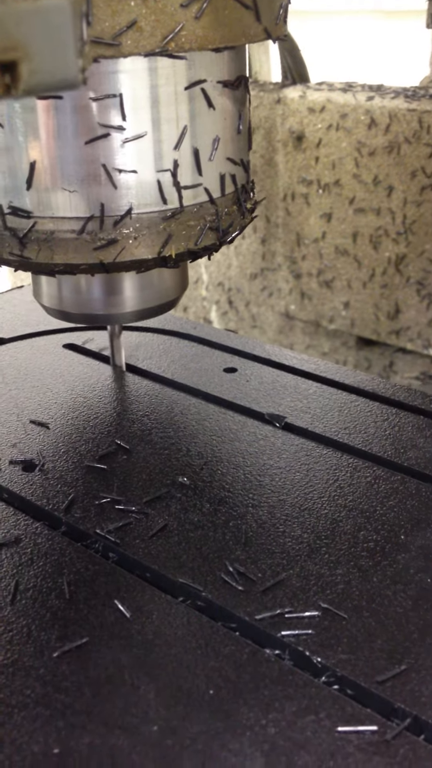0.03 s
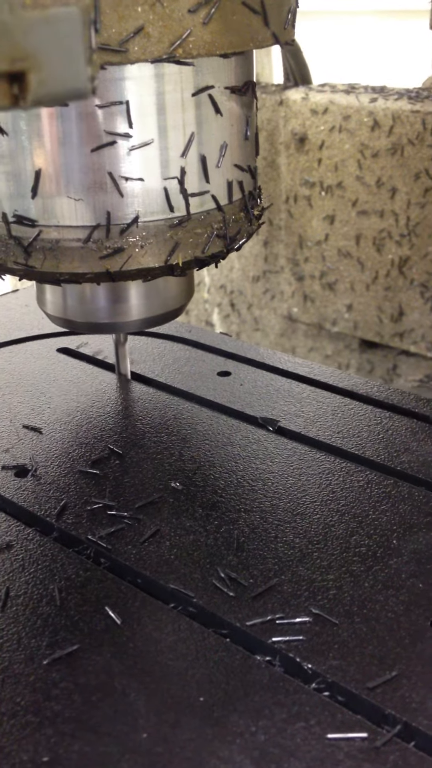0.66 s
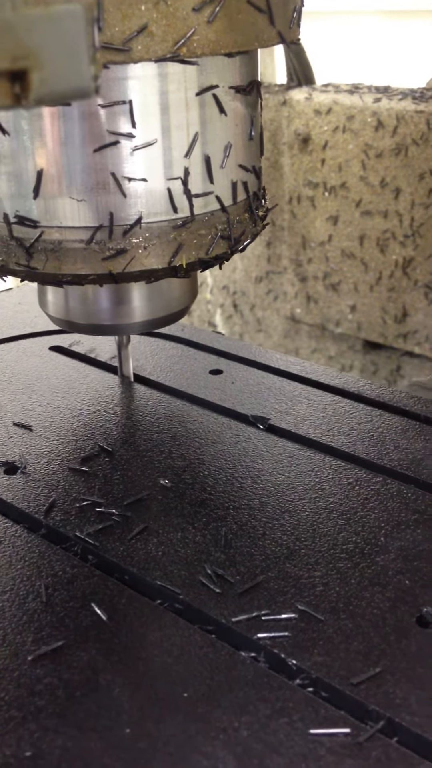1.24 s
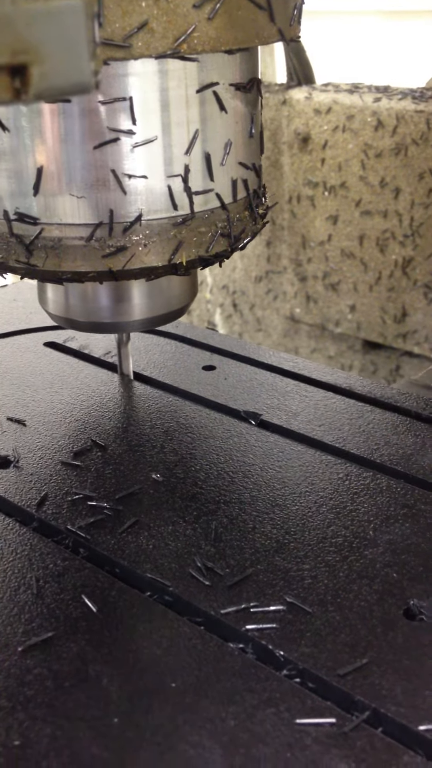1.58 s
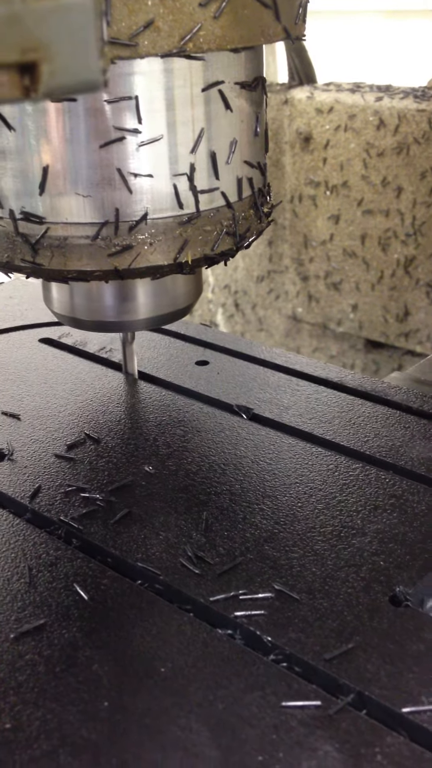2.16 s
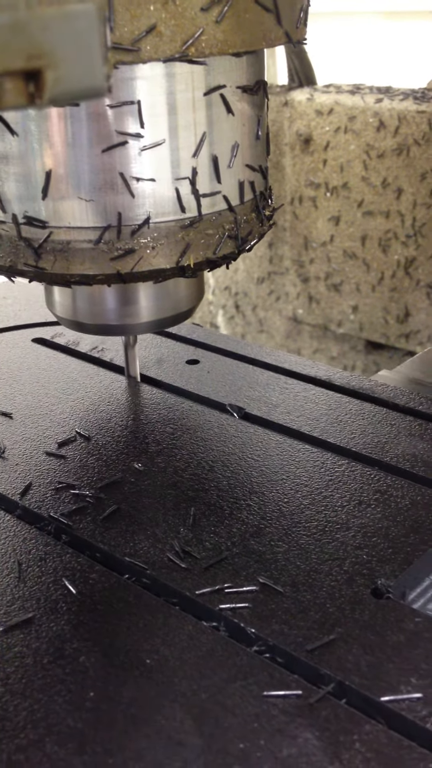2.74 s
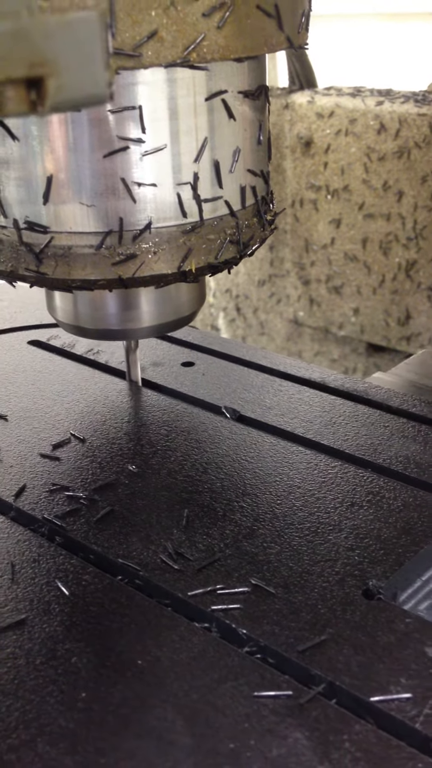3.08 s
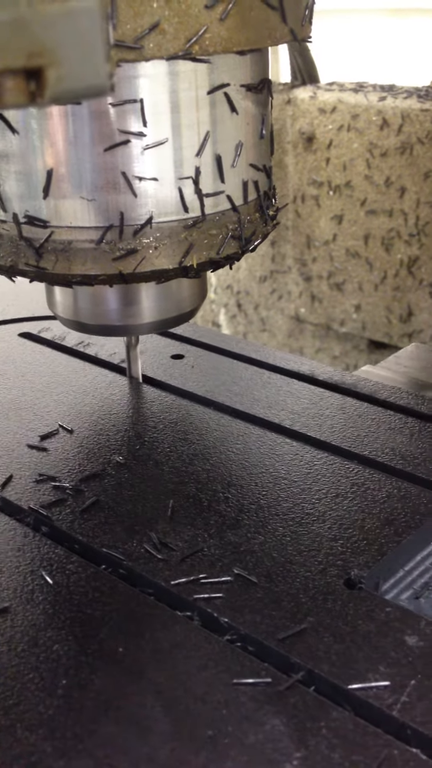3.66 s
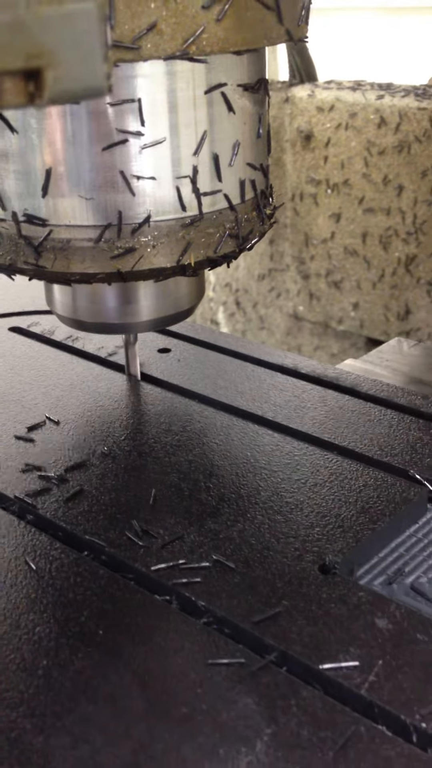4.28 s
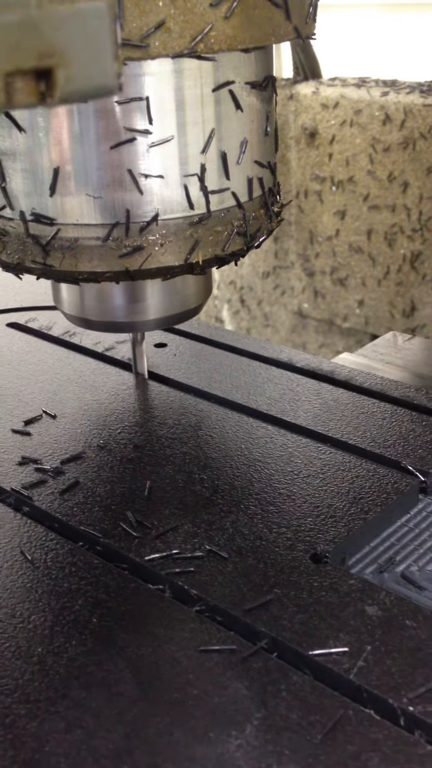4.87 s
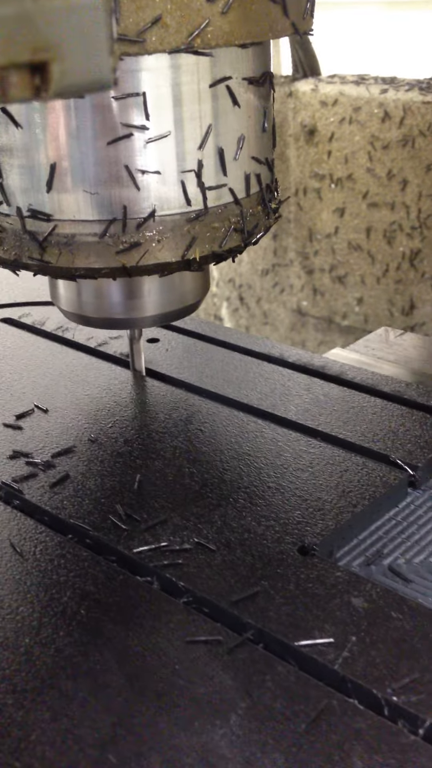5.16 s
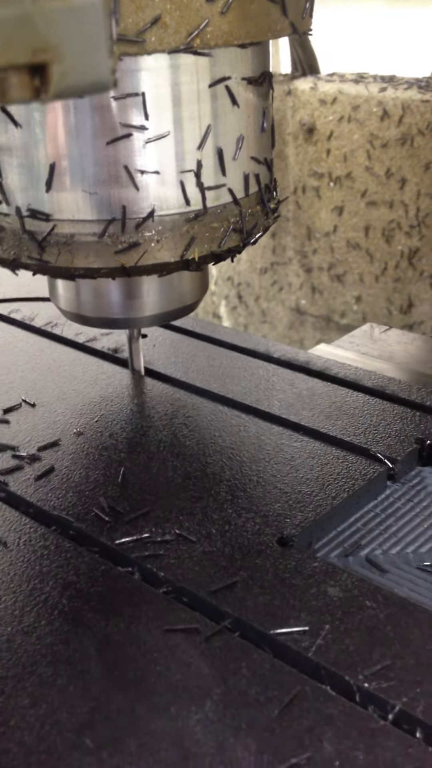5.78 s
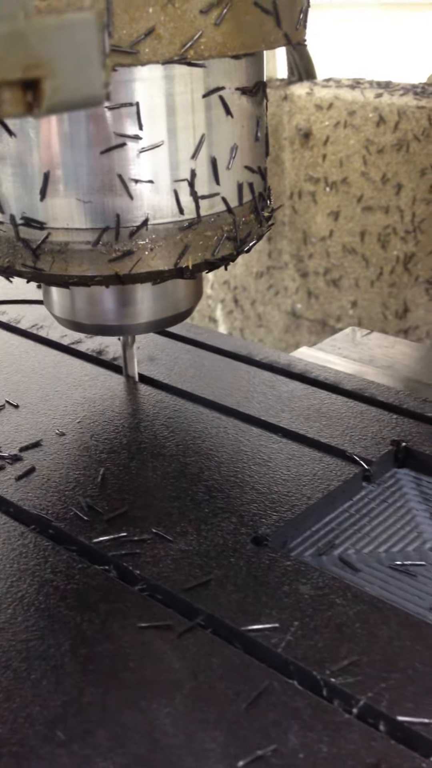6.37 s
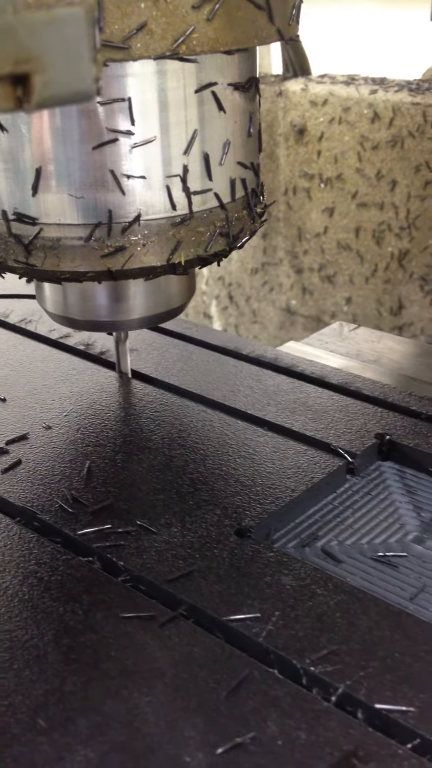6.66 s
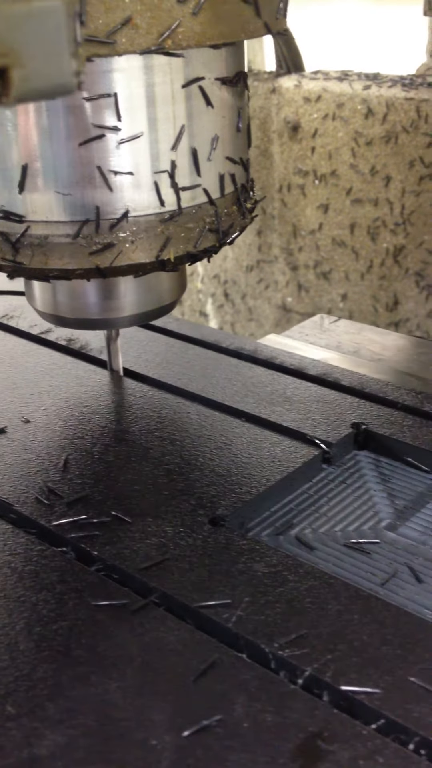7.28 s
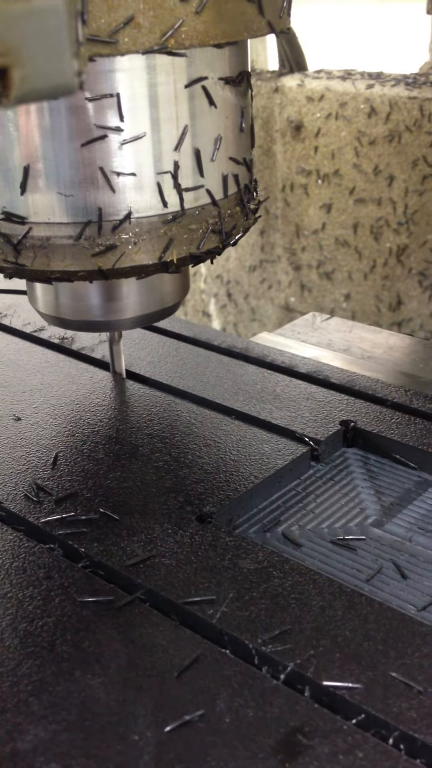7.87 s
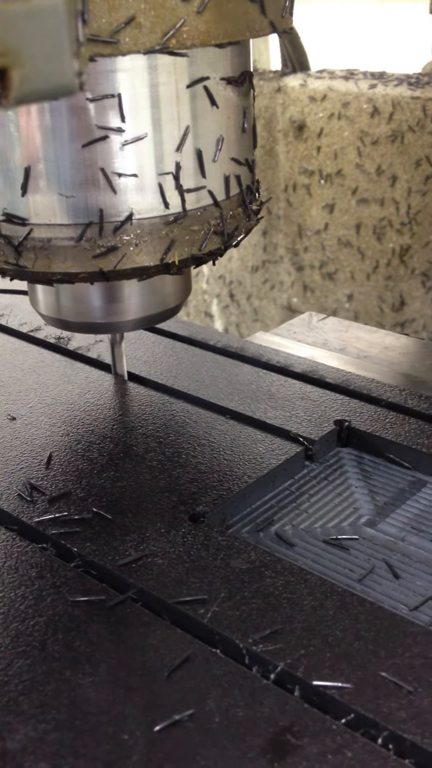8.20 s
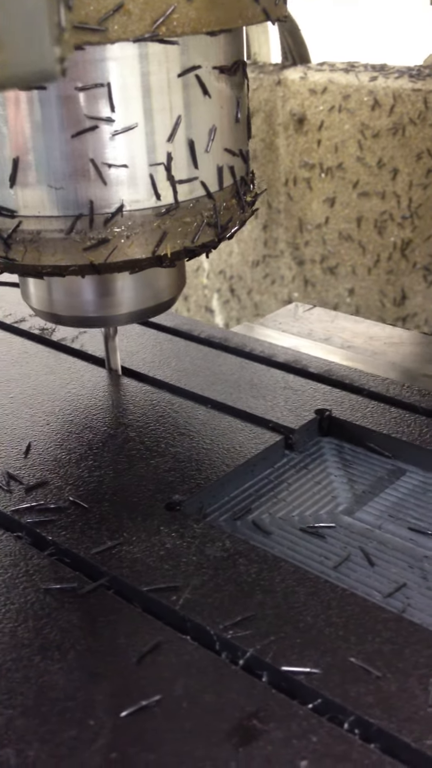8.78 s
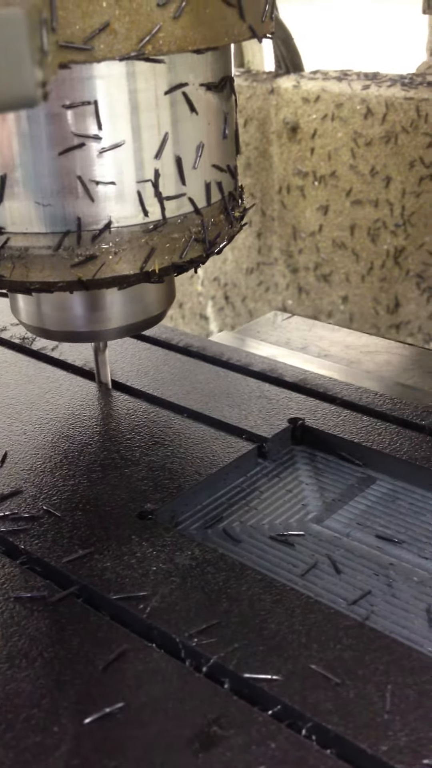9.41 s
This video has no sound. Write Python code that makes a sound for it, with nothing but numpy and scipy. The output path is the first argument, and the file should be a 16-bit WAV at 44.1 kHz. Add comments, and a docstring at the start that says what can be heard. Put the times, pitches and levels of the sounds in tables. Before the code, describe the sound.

Close to a CNC milling machine, a small cutter hisses steadily through metal while air rushes around the spindle. After about a second the cut squeals for a moment, then settles back into a high metallic hiss with a few ringing flares, the squeal returning at the end. A quiet, unchanging spindle whine and the softly surging hum of the feed motors sit in the background.

```python
"""Beside a CNC machine, one microphone close to the small cutter as it travels over the work.
At the back lie a few faint low bumps, the surging hum of the feed motors and the whine of the spindle,
which runs at constant speed. Air rushes round it; the strength of that rush carries the fizz and the
whine with it, the cut only a little, and now and then they sag or flare for an instant. Up front, the
cut hisses through a cluster of metal resonances near 5 kHz and squeals for a moment."""
import sys
import numpy as np
from scipy import signal
from scipy.fft import rfft, irfft, next_fast_len
from scipy.io import wavfile
from scipy.ndimage import uniform_filter1d, minimum_filter1d

SR = 44100
rng = np.random.default_rng(int(sys.argv[2]) if len(sys.argv) > 2 else 0)


def bounce(signal):
    """Save signal as a 16-bit WAV file at the path given by the first command-line argument."""
    frames = np.transpose(np.atleast_2d(signal))
    limited = np.clip(frames, -1, 1)
    pcm = np.round(limited * 32767).astype(np.int16)
    wavfile.write(sys.argv[1], SR, pcm)


N = 416304
TIME = np.arange(N) / SR
FFT_SIZE = 2 * next_fast_len(N // 2 + 1)
BIN_HZ = np.fft.rfftfreq(FFT_SIZE, 1 / SR)


def amp(db):
    """Decibels to gain."""
    return 10 ** (np.asarray(db) / 20)


def follow(rows):
    """Each column of a time curve, at every sample."""
    times, *columns = np.transpose(rows)
    return [np.interp(TIME, times, column) for column in columns]


def swell(top_s, half_s):
    """A smooth rise and fall of height 1."""
    return np.exp(-((TIME - top_s) / half_s) ** 2 / 2)


def spectrum_db(points):
    """Joins spectrum points on a log-frequency axis."""
    hz, db = np.transpose(points)
    return np.interp(np.log(BIN_HZ + 1), np.log(hz + 1), db)


def bells_db(rows):
    """Bell-shaped lifts or dips on the frequency axis."""
    return sum(db * np.exp2(-(2 * (BIN_HZ - hz) / width) ** 2) for hz, width, db in rows)


def mode_gain(modes):
    """Joint response of steep-sided resonances, summed in power; they radiate little bass."""
    power = 0
    for hz, width, db in modes:
        radiation = np.minimum(2 * BIN_HZ / hz, 1)
        power += (amp(db) * radiation / (1 + (2 * (BIN_HZ - hz) / width) ** 2)) ** 2
    return np.sqrt(power)


def noise(gain):
    """Noise of rms 1, shaped by a gain at each frequency."""
    white = rng.standard_normal(len(BIN_HZ)) + 1j * rng.standard_normal(len(BIN_HZ))
    shaped = irfft(gain * white)[:N]
    return shaped / np.sqrt(np.mean(shaped ** 2) + 1e-20)


def wander(rate_hz):
    """Smooth random motion of rms 1, no faster than about the given rate."""
    return noise(1 / (1 + (BIN_HZ / rate_hz) ** 4))


# faint bumps at the microphone: (time [s], peak level [dB])
BUMPS = [(2.029, -72), (2.158, -73), (2.57, -72), (3.029, -63), (4.689, -71), (4.769, -71), (6.759, -66),
         (6.889, -64), (8.339, -66), (9.019, -58)]

def bumps(hz, half_s):
    """Each bump is a soft low swing of about one cycle."""
    return sum(amp(db) * np.exp(-((TIME - s) / half_s) ** 2) * np.cos(2 * np.pi * hz * (TIME - s))
               for s, db in BUMPS)


def motor(lines, drift, waver_db):
    """Tones locked to one shaft, whose speed drifts a little; each can waver in strength."""
    shaft_time = np.cumsum(1 + drift * wander(rate_hz=5.6)) / SR
    tones = 0
    for hz, db in lines:
        strength = amp(db + waver_db * wander(rate_hz=8.3))
        tones += strength * np.sin(2 * np.pi * (hz * shaft_time + rng.random()))
    return np.sqrt(2) * tones


# hum of the feed motors, in the background: (frequency [Hz], relative level [dB])
FEED_TONES = [(581.3, -8), (610.5, -12), (436, -21), (291, -22)]
# their surges: (time of peak [s], half length [s], drive level [dB])
FEED_SURGES = [(.5, 0.089, -42), (1.3, .15, -45), (3.05, 0.25, -39.8), (3.96, 0.098, -40), (4.5, .2, -41.5),
               (5.35, .15, -42.5), (6.4, 0.22, -45.5), (8.13, .17, -39.7), (8.799, 0.42, -44)]

def feed_motors(idle_db):
    """The feed motors hum and surge, shaking a resonance of the machine frame."""
    surge_power = sum((amp(db) * swell(s, half)) ** 2 for s, half, db in FEED_SURGES)
    effort = np.sqrt(amp(idle_db) ** 2 + surge_power)
    hum = motor(FEED_TONES, drift=0.00243, waver_db=2.6)
    frame_ring = amp(-7) * noise(mode_gain([(608, 79, 0)]))  # at 608 Hz, 79 Hz wide
    return effort * (hum + frame_ring)


# strength of the air rushing round the spindle: (time [s], change from usual [dB])
RUSH_STRENGTH = [(0.0, -0.4), (1.6, -1.5), (1.92, -3), (2.56, -1.8), (2.88, 0.4), (3.68, -0.5), (3.84, 1.1),
                 (4.16, -0.5), (4.48, 0.5), (5.28, 0.0), (5.76, -0.5), (6.24, 1.4), (6.56, -0.5),
                 (6.72, 1.5), (7.04, 0.1), (7.36, 1.7), (7.68, 0.2), (9.44, 0)]
# brief sags and flares: (time [s], change [dB])
LURCHES = [(.12, -1.3), (.77, -2), (1.04, -1), (1.8, -2), (2.15, 1.6), (2.98, 0.8), (4.66, 0.3),
           (4.88, -1.2), (5.73, -1.8), (8.13, 1)]

def ride_rush(flutter, level_db, slope, flutter_db):
    """Gain of a layer that lurches, flutters and follows the rush by `slope` dB per dB."""
    rush_db = follow(RUSH_STRENGTH)[0]
    lurch_db = sum(db * swell(s, half_s=0.031) for s, db in LURCHES)
    return amp(level_db + slope * rush_db + lurch_db + flutter_db * flutter)


# the spindle's whine, under the rush: (frequency [Hz], relative level [dB])
WHINE_TONES = [(866.7, -1.3), (1367, -18), (1209, -20), (678, -18), (807, -20), (299, -21), (180, -23)]

def spindle_whine(flutter):
    """The spindle holds its pitch while its loudness rides on the rush."""
    tones = motor(WHINE_TONES, drift=0.00022, waver_db=0)
    return tones * ride_rush(flutter, level_db=-46.5, slope=0.97, flutter_db=0.3)


# rumble and rush of the machine at close range: (frequency [Hz], relative density [dB])
RUSH_SPECTRUM = [(80, -18), (120, -11.5), (170, -7), (330, -4), (560, 1), (850, 0.5), (1050, 3.5),
                 (1420, -1), (2200, 3.5), (3800, 6.5), (6000, 5), (9000, -15.5)]
# resonances and hollows of the spindle housing: (frequency [Hz], width [Hz], lift [dB])
HOUSING_COLOUR = [(473, 28, -4), (520, 44, -0.5), (1563, 110, 2.5), (1902, 39, 5), (2480, 140, 2.5),
                  (2830, 180, 5.5), (3013, 90, 3.5), (3045, 67, 2.5), (3744, 98, 4), (4020, 200, 4.5)]
# fizz of fast air: (frequency [Hz], relative density [dB])
FIZZ_SPECTRUM = [(4000, -42), (6000, -25), (6600, 5), (7300, 4), (8100, 4.5), (8600, 1.5), (9300, -3.5),
                 (10600, -2.5), (11150, 1.5), (12700, 3.5), (13500, -3), (14000, 2.5), (15100, 4),
                 (16000, -14)]

def air_rush(flutter, low_edge_hz):
    """Air and bearings rush through the housing; the fizz above grows faster than the body."""
    low_cut = 1 / np.sqrt(1 + (low_edge_hz / (BIN_HZ + 1)) ** 8)
    body = noise(low_cut * amp(spectrum_db(RUSH_SPECTRUM) + bells_db(HOUSING_COLOUR)))
    body *= ride_rush(flutter, level_db=-27, slope=0.91, flutter_db=0.5)
    fizz = noise(amp(spectrum_db(FIZZ_SPECTRUM)))
    fizz *= ride_rush(flutter, level_db=-22, slope=1.24, flutter_db=0.47)
    high_pass = signal.butter(2, 500, "high", fs=SR, output="sos")
    return body + signal.sosfilt(high_pass, fizz)


# narrow noise bands: (time of peak [s], half length [s], frequency [Hz], width [Hz], level [dB])
BAND_SWELLS = [(.1, 0.56, 7060, 180, -32), (.8, .57, 430, 110, -53), (3.0, .5, 5040, 100, -22.5),
               (3.8, 1.2, 426, 131, -51), (4.3, 0.64, 5180, 150, -25.5), (4.65, .4, 4870, 90, -28),
               (7.5, 0.97, 5060, 149, -31), (9.05, 0.47, 14560, 170, -30), (9.3, 1.4, 4200, 220, -34),
               (9.4, 0.78, 6100, 200, -31)]

def band_swells():
    """Narrow noise bands swell and fade: flares near 5 kHz, a thin high whistle, a faint 430 Hz hum."""
    return sum(amp(db) * swell(s, half) * noise(mode_gain([(hz, width, 0)]))
               for s, half, hz, width, db in BAND_SWELLS)


# one mode on the edge of chatter, near the microphone: (time [s], level [dB], frequency [Hz])
SQUEAL_PATH = [(0, -27, 5400), (1.05, -20.5, 5460), (1.35, -18, 5490), (2.15, -17.5, 5470),
               (2.5, -20.5, 5455), (3.5, -26.5, 5336), (8.3, -29, 5320), (9.44, -20.5, 5370)]

def squeal(width_hz):
    """A lightly damped mode, driven by noise, swells and glides as the cutter's contact shifts."""
    level_db, hz = follow(SQUEAL_PATH)
    phase = 2 * np.pi * np.cumsum(hz) / SR
    band = 1 / (1 + (2 * BIN_HZ / width_hz) ** 2)
    whistle = noise(band) * np.cos(phase) + noise(band) * np.sin(phase)
    return amp(level_db) * whistle


# lower and upper modes of cutter and holder: (frequency [Hz], width [Hz], relative level [dB])
LOW_MODES = [(4446, 140, -7.5), (4655, 176, -3), (4962, 320, 2), (5260, 177, 1)]
HIGH_MODES = [(5483, 290, 3), (5700, 450, 3.5), (5930, 220, 3), (6360, 710, -4), (7130, 150, -4.5)]
# close hiss of the travelling cutter: (time [s], lower modes' base level [dB], upper modes' [dB])
CUT_LEVELS = [(0, -18.7, -18.2), (1.1, -17.7, -18.5), (2.1, -18.4, -19.5), (3.0, -18, -21.4),
              (4.1, -18, -21.3), (5.4, -18.5, -19.8), (6.7, -17.7, -19.6), (7.7, -18.2, -20.5),
              (9.44, -19.5, -19.5)]

def cut(flutter):
    """Dense, uneven rubbing at the cutter's edge keeps its modes ringing."""
    low_db, high_db = follow(CUT_LEVELS)
    low = noise(mode_gain(LOW_MODES)) * amp(low_db)
    high = noise(mode_gain(HIGH_MODES)) * amp(high_db)
    return (low + high) * ride_rush(flutter, level_db=0, slope=0.19, flutter_db=0.49)


def scene():
    """The whole machine at one close microphone; whine, rush and cut flutter together."""
    flutter = wander(rate_hz=17) + 0.46 * wander(rate_hz=3.8)  # quick flutter over a slower sway
    spindle = spindle_whine(flutter) + air_rush(flutter, low_edge_hz=112)
    cutter = cut(flutter) + squeal(width_hz=210)
    background = band_swells() + feed_motors(idle_db=-47) + bumps(hz=38, half_s=0.014)
    mix = background + spindle + cutter
    return np.array([mix, mix])


# narrow dips and a lift in the treble: (frequency [Hz], width [Hz], gain [dB])
TREBLE_COLOUR = [(7580, 140, -3), (8940, 230, -18), (9640, 240, -15), (13330, 340, -12), (13950, 250, 5),
                 (14230, 160, -4)]
PEAK_CEILING, BAND_EDGE_HZ = 0.81, 15300  # the ceiling is a share of full scale

def record(dry):
    """After the microphone: treble colour, a limiter on the highest peaks, then a steep band limit."""
    spectrum = rfft(dry, FFT_SIZE, axis=1) * amp(bells_db(TREBLE_COLOUR))
    coloured = irfft(spectrum, axis=1)[:, :N]
    allowed_gain = np.minimum(1, PEAK_CEILING / (abs(coloured).max(axis=0) + 1e-9))
    held_gain = minimum_filter1d(allowed_gain, size=301)
    smooth_gain = uniform_filter1d(uniform_filter1d(held_gain, size=151), size=151)
    low_pass = signal.firwin(1023, BAND_EDGE_HZ, window=("kaiser", 9), fs=SR)
    return signal.oaconvolve(coloured * smooth_gain, low_pass[None], "same", axes=1)


dry = scene()
out = record(dry)
bounce(out)
```